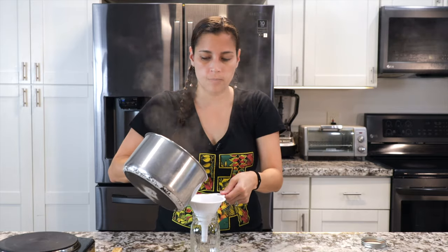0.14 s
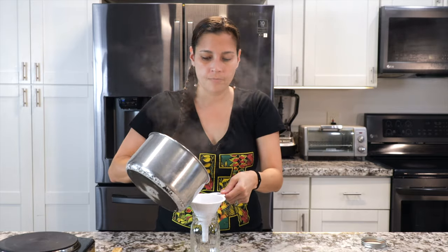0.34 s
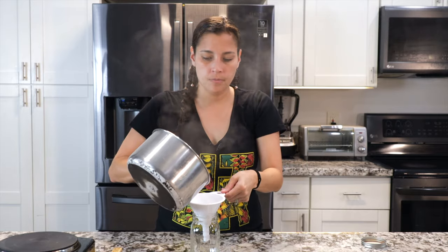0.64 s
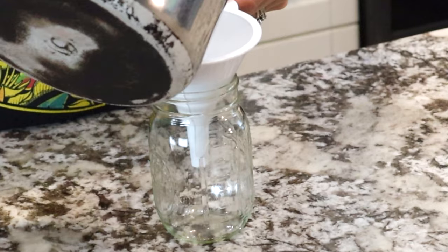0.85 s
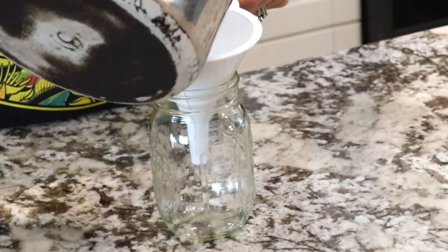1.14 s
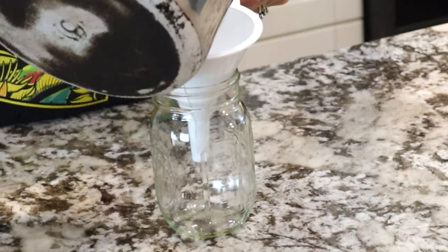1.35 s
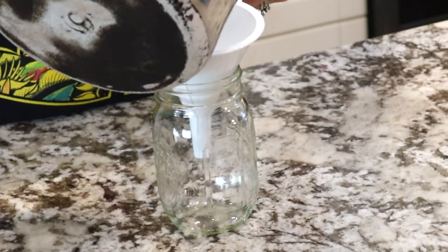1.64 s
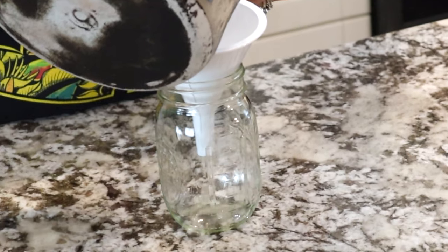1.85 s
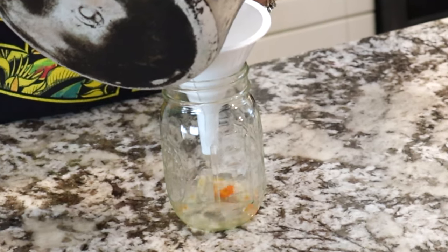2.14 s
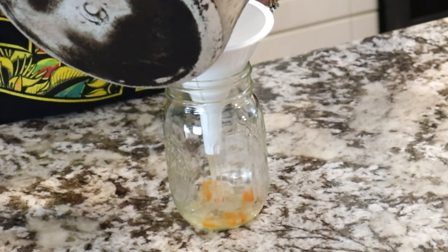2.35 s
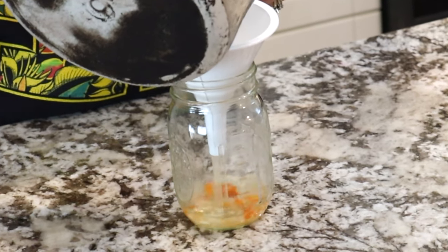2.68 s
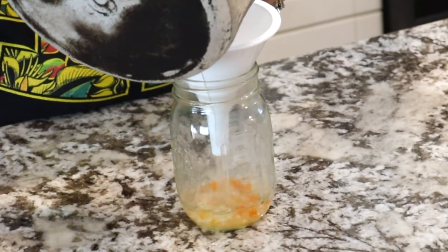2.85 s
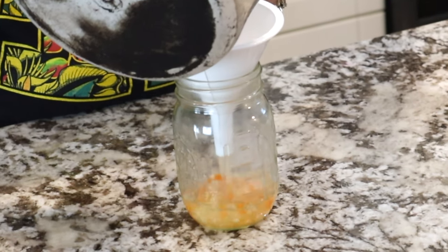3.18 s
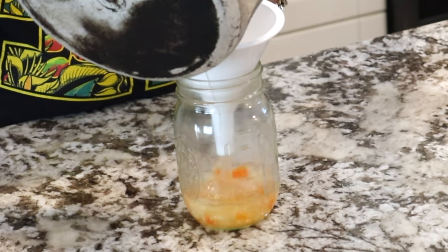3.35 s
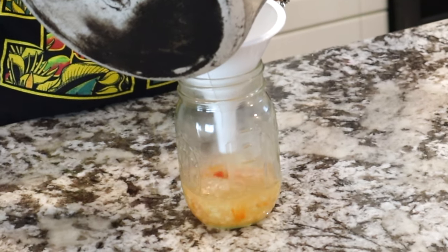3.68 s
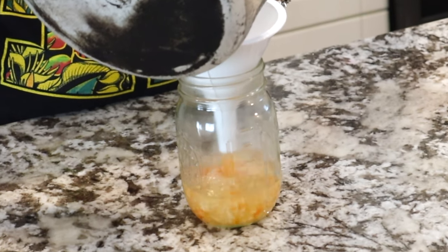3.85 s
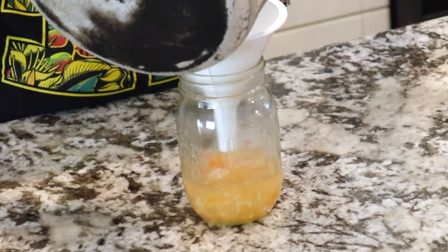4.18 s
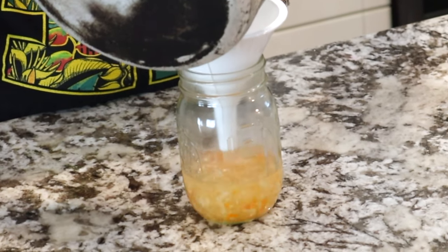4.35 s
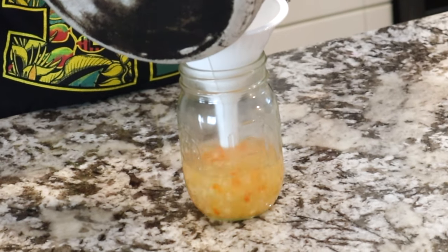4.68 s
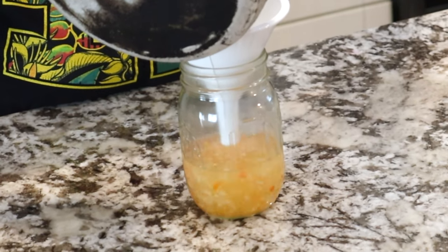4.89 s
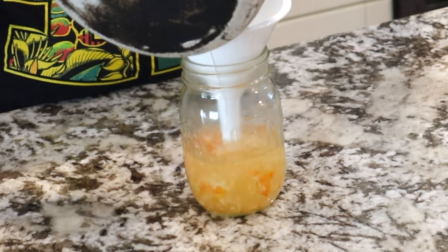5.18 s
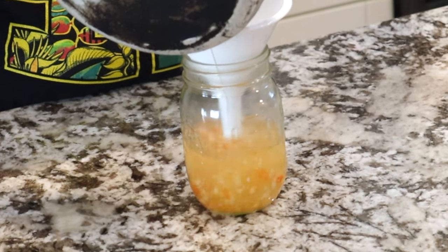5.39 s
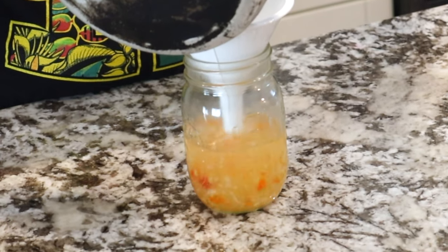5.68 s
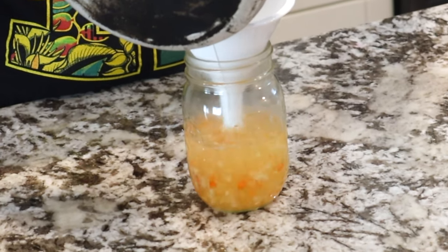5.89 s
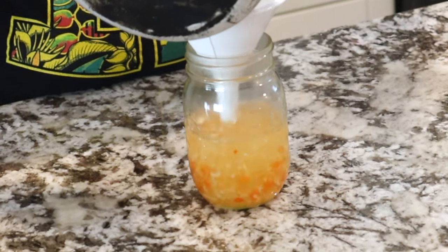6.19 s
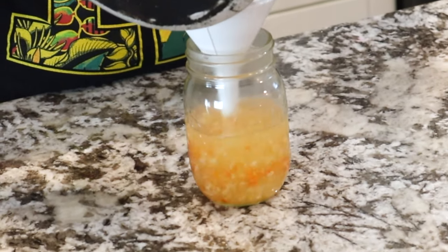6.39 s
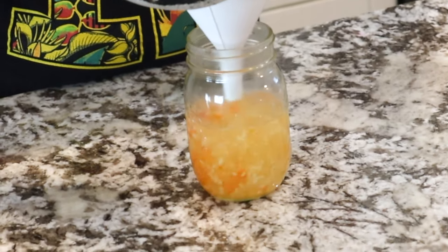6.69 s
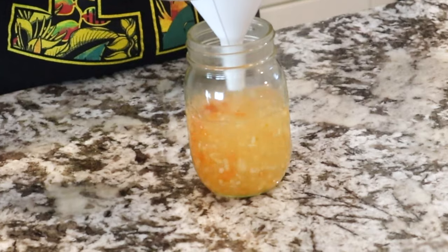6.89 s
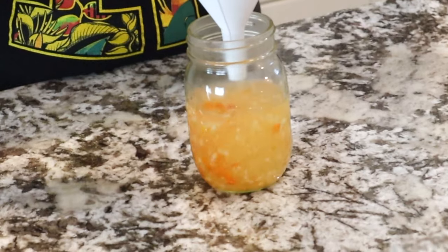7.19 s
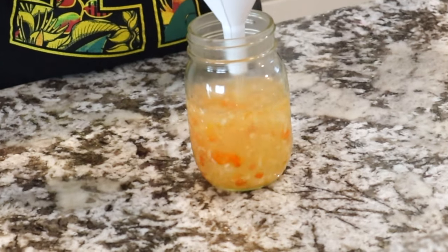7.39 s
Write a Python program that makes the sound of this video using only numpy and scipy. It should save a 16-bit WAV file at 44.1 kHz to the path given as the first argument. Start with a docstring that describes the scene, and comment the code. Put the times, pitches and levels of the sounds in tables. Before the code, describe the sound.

In a quiet humming kitchen, soft bumps precede a bubbly, uneven pour through a funnel into a jar, ending in sparse drips and glugs.

```python
"""In a quiet kitchen with a faint hum, bumps thud through the stone counter that carries the microphone.
The funnel taps the jar rim, then the pan knocks on the funnel, each ringing its own set of tones.
From about 1.9 s hot liquid with small lumps trickles from a saucepan through a plastic funnel into a glass jar:
random drops trap bubbles that ring the spout, the cone and the air in the filling jar, and single drops stand out.
Near the end the draining funnel glugs with large slow bubbles."""
import sys
import numpy as np
from scipy import signal
from scipy.io import wavfile
from scipy.ndimage import uniform_filter1d

SR = 44100
rng = np.random.default_rng(int(sys.argv[2]) if len(sys.argv) > 2 else 0)


def master(y):
    """Save y as 16-bit WAV."""
    cut = np.clip(np.atleast_2d(y).T, -1, 1)
    pcm = np.round(cut * 32767)  # scale
    wavfile.write(sys.argv[1], SR, pcm.astype(np.int16))


N = 332246


def gain_of(db):
    """Turns decibels into a gain."""
    return 10 ** (np.asarray(db) / 20)


def evened(x):
    """Scales a sound to an average (rms) strength of 1."""
    return x / np.sqrt(np.mean(x ** 2) + 1e-20)


def read(points, hz):
    """Reads a (f/Hz, value) table between its points, on a log pitch axis."""
    f, value = np.transpose(points)
    return np.interp(np.log(hz + 1), np.log(f + 1), value)


def add(mix, s, sound):
    """Mixes a sound in at s seconds."""
    part = mix[round(s * SR):][:len(sound)]
    part += sound[:len(part)]


def resonate(x, hz, width):
    """Shifts the pitch hz down to zero, smooths twice and shifts back: a steep resonance with a soft start."""
    turn = np.exp(2j * np.pi * np.cumsum(hz * np.ones(len(x))) / SR)
    r = np.exp(-np.pi * width / SR)
    low = x / turn + 1e-18
    for _ in range(2):
        low = signal.lfilter([1 - r], [1, -r], low)
    return 2 * (turn * low).real


def body(modes, x):
    """Rings a set of resonances with x; neighbours get opposite signs."""
    return sum((-1) ** k * gain_of(db) * resonate(x, hz, width) for k, (hz, width, db) in enumerate(modes))


def waver(count, depth):
    """An uneven gain around 1 that changes within a few milliseconds."""
    return 1 + depth * evened(resonate(rng.standard_normal(count), 0, 160))


def bubble(hz, cycles, rise=0.0073):
    """Trapped air swells softly, then dies away as its pitch rises a little; the envelope peaks at 1."""
    u = np.arange(round(4 * cycles * SR / hz)) * hz / SR / cycles
    shape = u ** 0.76 * np.exp(-5.0 * u)
    return shape / shape.max() * np.sin(2 * np.pi * cycles * (u + rise * u ** 2))


# colour of the room tone and microphone hiss: (f/Hz, relative level per Hz/dB)
HUSH_COLOUR = [(12, -14), (25, 0), (45, -15), (75, -4.5), (120, -6.5), (190, -4.5), (350, -11),
               (600, -16.5), (950, -24), (1600, -30), (2000, -36.5), (5000, -37), (16000, -39)]
# wavering appliance hum: (f/Hz, width/Hz, level/dB)
HUM_TONE = (119.6, 17.7, -66.5)


def hush():
    """Noise shaped over pitch, its bass swelling a little, plus a narrow band of noise as the hum."""
    frames, hz = N // 512 + 5, np.fft.rfftfreq(2048, 1 / SR)
    a, b, patches = rng.standard_normal((frames, 1025, 3)).T
    smooth = uniform_filter1d(uniform_filter1d(patches, 8, 0), 10, 1)
    swell_db = 4.5 * evened(smooth) / (1 + hz[:, None] / 400)  # weaker towards the treble
    spectrum = (a + 1j * b) * gain_of(read(HUSH_COLOUR, hz)[:, None] + swell_db)
    air = evened(signal.istft(spectrum, nperseg=2048, noverlap=1536)[1][:N])
    hum_hz, hum_width, hum_db = HUM_TONE
    hum = evened(resonate(rng.standard_normal(N), hum_hz, hum_width))
    return gain_of(-62) * air + gain_of(hum_db) * hum


# bumps on the counter: (t/s, level/dB, first f/Hz, last f/Hz, time to fall 60 dB/s, share of the slab mode)
COUNTER_BUMPS = [(0.0, -47, 89, 36, .12, 0.49), (1.065, -35.5, 315, 44, 0.13, 0.98),
                 (1.316, -42.5, 296, 44, 0.14, 0.95), (1.536, -44, 254, 40.4, 0.1, 0.23),
                 (2.1, -57, 81.5, 30.2, 0.21, .1), (2.83, -50.5, 120, 30, 0.21, 0.19),
                 (3.162, -38.5, 268, 39.5, 0.12, 0.42), (4.298, -46, 196, 62, 0.067, 0.49),
                 (4.543, -31, 311, 38.3, 0.13, 0.52), (5.793, -32.5, 288, 38, 0.14, 0.37),
                 (6.03, -25.5, 305, 35.8, 0.12, 0.31)]


def thuds():
    """Bending waves in the slab: treble arrives first, so the pitch falls; a slab mode and a dull rattle join in."""
    out, t = np.zeros(N), np.arange(SR // 2) / SR
    for s, db, first_hz, last_hz, length, slab_share in COUNTER_BUMPS:
        hz = last_hz + (first_hz - last_hz) * np.exp(-t / 0.0062)
        bend = np.sin(2 * np.pi * np.cumsum(hz) / SR)
        slab = np.sin(2 * np.pi * 93 * t) * (1 - np.exp(-t / 0.0055))
        rattle = 0.13 * np.exp(-t / 0.031) * evened(resonate(rng.standard_normal(len(t)), 350, 380))
        onset = 1 - np.exp(-t / 0.0011)
        fade = gain_of(db - 60 * (t / length) ** 1.84)
        add(out, s, fade * (onset * (bend + slab_share * slab) + rattle))
    return out


# taps of the funnel on the jar rim: (t/s, relative level/dB)
RIM_TAPS = [(0.847, -54.5), (0.851, -52), (.875, -59), (1.061, -57.5)]
# what the taps ring: (f/Hz, width/Hz, relative level/dB)
RIM_MODES = [(1140, 160, -10), (1510, 260, 1), (2300, 140, -13), (2810, 260, -17)]


def rim_taps():
    """Each light tap is a single click that rings the rim's resonances."""
    blows = np.zeros(N)
    for s, db in RIM_TAPS:
        blows[round(s * SR)] = gain_of(db + 37.0)
    return body(RIM_MODES, blows)


# how long the kitchen rings: (f/Hz, time to fall 60 dB/s)
KITCHEN_DECAY = [(300, 0.46), (1500, 0.24), (5000, 0.24), (12000, 0.025)]


def kitchen_echo(x):
    """Echoes are sparse taps of random sign, each pitch band dying at its own speed."""
    taps = np.zeros(SR // 2)
    at = np.arange(200, SR // 2 - 20, 20)
    taps[at + rng.integers(0, 20, len(at))] = rng.choice([-1., 1.], len(at))
    hz, t, z = signal.stft(taps, SR, nperseg=256)
    fade = gain_of(-60 * t / read(KITCHEN_DECAY, hz)[:, None])
    tail = signal.istft(z * fade, SR, nperseg=256)[1]
    return signal.fftconvolve(x, tail / np.linalg.norm(tail))[:N]


# knocks of the pan on the funnel: (t/s, peak level/dB, hardness as treble tilt per octave/dB,
# damping by the hand as a factor on ring time)
PAN_KNOCKS = [(1.69, -41, -26, 0.56), (4.499, -41, -33, 0.65), (6.051, -21, -1, 0.5),
              (6.078, -31.5, 9, 0.77), (6.968, -39.5, -12, 0.35), (6.999, -38, -4.5, 0.59)]
# tones of the saucepan: (f/Hz, relative level/dB, undamped time to fall 60 dB/s)
PAN_MODES = [(370, -6, 0.13), (465, -0.5, 0.23), (558, 3, 0.17), (610, -9, 0.1), (631, -8, 0.35),
             (720, -3, 0.56), (816, -10.5, 0.75), (837, -8.5, 0.87), (1422, 4, 0.13), (1616, -6, 0.4),
             (2300, -34, 0.81), (3170, -15, 0.038), (4640, -22, 0.046)]


def knocks():
    """Each knock rings the pan's tones; soft blows favour the low ones."""
    out, t = np.zeros(N), np.arange(SR // 2) / SR
    phases = rng.random((len(PAN_KNOCKS), len(PAN_MODES)))
    for (s, db, tilt_db, damping), turns in zip(PAN_KNOCKS, phases):
        ring = np.zeros(len(t))
        for (hz, mode_db, t60), turn in zip(PAN_MODES, turns):
            fade = gain_of(mode_db + tilt_db * np.log2(hz / 500) - 60 * t / (t60 * damping))
            ring += fade * np.sin(2 * np.pi * (hz * t + 0.43 * turn))
        strike = 1 + 2.0 * np.exp(-t / .008)  # the blow is louder than the ring that follows
        ring = ring * strike * waver(len(t), 0.58) * (1 - np.exp(-t / 0.0016))
        add(out, s, gain_of(db) * ring / abs(ring).max())
    return out


# the jar fills and its air shortens: (t/s, neck f/Hz, lengthwise air f/Hz, spout pitch as a factor,
# relative ring level of the bare glass/dB)
JAR_FILL = [(2.0, 357, 1860, 0.93, 3), (2.8, 380, 2130, 1, -10), (3.5, 419, 2425, 0.98, -27),
            (4.5, 420, 2410, 0.99, -3), (5.3, 504, 2660, 0.98, 0.5), (6.5, 518, 2310, 1, -61),
            (7.1, 536, 2300, 0.94, -41), (7.3, 533, 2320, 0.86, -6)]


def filling(column):
    """Reads one column of the filling jar for every sample."""
    rows = np.transpose(JAR_FILL)
    return np.interp(np.arange(N) / SR, rows[0], rows[column])


# resonances, each (f/Hz, width/Hz, relative level/dB):
# air in the funnel tube, before the spout pitch factor
SPOUT_MODES = [(1313, 360, 19.5), (1450, 630, 14.5)]
# the funnel cone
CONE_MODES = [(2600, 550, -8), (3202, 286, 2), (3830, 770, -8)]
# small cross modes of jar and funnel
CROSS_MODES = [(4800, 2340, -6), (6100, 2100, 4), (7510, 1130, 2.5), (8300, 580, 4.5), (9400, 1430, -2.5),
               (10740, 1400, -4), (12000, 9000, -60)]
# the jar's glass
GLASS_MODES = [(3400, 130, -8), (5220, 420, -15), (5410, 250, -11), (6100, 370, -14), (8100, 170, -6.5)]


def voices(plop, blip, spray, smack):
    """Plops ring the spout, blips the jar air and cone, spray the cross modes and glass; smacks join the last two."""
    t = np.arange(N) / SR
    spout_modes = [(hz * filling(column=3), width, db) for hz, width, db in SPOUT_MODES]
    # a hiss follows each landing
    puff = signal.lfilter([1], [1, -np.exp(-1 / (0.0011 * SR))], abs(spray)) * rng.standard_normal(N)
    wet = spray + 0.059 * puff + 1.3 * smack
    blip = blip + 0.79 * smack
    # the finest spray is heard without colouring, and weakens as the fall gets shorter
    finest = resonate(0.77 * smack + 0.031 * puff, hz=12140, width=5900)
    crisp = gain_of(0.5 - 2 * t) * finest
    cone = gain_of(-0.1 * (t - N / SR / 2)) * body(CONE_MODES, blip)  # eases off by 0.1 dB a second
    jar_air = gain_of(3.0) * resonate(blip, filling(column=2), 255)
    glass = gain_of(filling(column=4) + 18.5) * body(GLASS_MODES, wet)
    return body(spout_modes, plop), cone + jar_air, body(CROSS_MODES, wet) + glass + crisp


def slosh():
    """Power that each loud drop adds to the trickle's plops, blips and spray, dying away after it."""
    kicks = np.zeros((3, N))
    for s, blip_db, plop_db, spray_db, *_ in LOUD_DROPS:
        stir_db = np.add((plop_db, blip_db, spray_db), (-13.5, -17, -14.5))
        kicks[:, round(s * SR)] = gain_of(stir_db) ** 2
    slosh_s = 0.022
    return signal.lfilter([1], [1, -np.exp(-2 / (slosh_s * SR))], kicks)


# jar air humming through the neck: (t/s, level before a fixed trim/dB)
NECK_LEVEL = [(1.95, -85), (2.05, -66), (2.3, -78.5), (3.3, -73.5), (3.45, -53), (3.72, -62), (3.9, -58),
              (4.15, -72.5), (4.28, -60), (4.45, -67), (4.55, -56.5), (4.85, -65.5), (5.1, -63.5),
              (5.3, -76), (5.5, -61), (5.7, -92)]


def neck_hum(sizes):
    """Drops and a little noise pump the jar's air through its neck, which hums at its own pitch."""
    hum = resonate(sizes + 0.11 * rng.standard_normal(N), filling(column=1), 95)
    level_db = np.interp(np.arange(N) / SR, *np.transpose(NECK_LEVEL), left=-130, right=-130)
    return gain_of(level_db + 1.0) * evened(hum)


# strength of the trickle before fixed trims: (t/s, level of the spout ring/dB, level of the spray/dB)
TRICKLE_LEVEL = [(1.919, -91, -84.5), (1.99, -73, -70), (2.2, -82, -76), (2.45, -67, -67),
                 (2.65, -71.5, -67.5), (2.9, -61.5, -67), (3.03, -70, -68.5), (3.16, -58.5, -59),
                 (3.51, -61.5, -69.5), (3.78, -65, -71), (4.2, -61, -64.5), (4.4, -69, -70.5),
                 (4.5, -65, -75.5), (4.75, -65, -65), (5.15, -57, -84), (5.42, -75, -66),
                 (5.73, -64.5, -69.5), (6.05, -70, -59), (6.2, -67, -73.5), (6.45, -82, -79),
                 (6.58, -83, -83), (6.63, -57.5, -65), (6.81, -62.5, -68.5), (7.06, -61, -62.5),
                 (7.2, -65.5, -65), (7.27, -71.5, -80.5), (7.37, -80, -88), (7.42, -74, -83.5),
                 (7.53, -56.5, -57)]
# bubbles of plops, blips and spray, one row each: (low f/Hz, high f/Hz, length in cycles)
BUBBLE_KINDS = [(1065, 1980, 4.6), (2150, 4860, 10.4), (4480, 10450, 39.3)]


def trickle():
    """Random drops of widely spread size, in clumps, over a fine splash; each traps bubbles of chance pitch."""
    drops_per_s = 950
    clumps = gain_of(5.0 * evened(uniform_filter1d(rng.standard_normal(N), 700)))
    hits = rng.random(N) < drops_per_s / SR * clumps / clumps.mean()
    sizes = hits * gain_of(5.4 * np.minimum(rng.exponential(1, N), 3.5))
    parts = []
    for low_hz, high_hz, cycles in BUBBLE_KINDS:
        kind = rng.integers(0, 10, N)  # one of ten bubble pitches for each drop
        size = sizes * gain_of(3.2 * rng.standard_normal(N))
        train = np.zeros(N)
        for k, hz in enumerate(np.geomspace(low_hz, high_hz, num=10)):
            train += signal.oaconvolve(size * (kind == k), bubble(hz, cycles))[:N]
        splash = evened(resonate(rng.standard_normal(N), (low_hz + high_hz) / 2, high_hz - low_hz))
        parts.append(evened(train) + .4 * splash)
    rings = voices(*parts, 0.66 * evened(sizes))

    s, spout_db, spray_db = np.transpose(TRICKLE_LEVEL)
    levels_db = spout_db + 2.5, spray_db - 1, spray_db + 2.5  # plops, blips, spray
    out = neck_hum(sizes)
    for ring, raw, db, trim_db, stir in zip(rings, parts, levels_db, (2.5, 0, 2.5), slosh()):
        steady = gain_of(np.interp(np.arange(N) / SR, s, db, left=-130 + trim_db))
        out += np.sqrt(steady ** 2 + stir) * evened(evened(ring) + 0.52 * raw)
    return out


# loud drops and lumps, levels before fixed trims: (t/s, blip level/dB, plop level/dB, spray level/dB,
# blip f/Hz, spray f/Hz)
LOUD_DROPS = [(1.9775, -64, -63.5, -55, 3380, 7600), (2.03, -52, -59, -55, 3280, 5480),
              (2.0722, -47, -48.5, -75, 1930, 7530), (2.0897, -42.5, -46.5, -51, 2270, 7630),
              (2.1637, -53, -53, -54.5, 3340, 5560), (2.2808, -52, -82, -60.5, 1920, 6000),
              (2.3766, -52, -60, -57, 2300, 5700), (2.484, -42, -49.5, -51, 3400, 5340),
              (2.5313, -42, -63, -38.5, 3540, 9400), (2.5662, -51, -49.5, -47, 3500, 6000),
              (2.6553, -46, -47.5, -57, 2420, 9050), (2.6982, -43, -51, -50.5, 1910, 4950),
              (2.723, -33.5, -32, -48, 1780, 4530), (2.7302, -44, -34.5, -62, 1850, 5240),
              (2.746, -48, -53, -47, 2150, 5700), (2.7751, -44, -43.5, -36, 2070, 9470),
              (2.7877, -58, -44, -54, 1800, 5930), (2.8, -52, -59, -44.5, 3490, 5900),
              (2.8179, -45, -40.5, -56, 1820, 5950), (2.8529, -42, -50, -49, 2170, 7800),
              (2.9592, -44, -45.5, -54, 2080, 4600), (2.986, -46, -48, -57, 2250, 5460),
              (3.0555, -45, -52, -47, 3550, 6020), (3.1, -39, -60, -58, 2740, 4380),
              (3.1134, -45, -61, -42.5, 2270, 9300), (3.1743, -55, -43.5, -49, 2240, 6250),
              (3.3348, -59, -45.5, -58, 2250, 6300), (3.3718, -43, -47, -48, 2600, 5600),
              (3.4468, -34.5, -28.5, -68, 2600, 4640), (3.5005, -50, -54, -53, 2310, 5500),
              (3.5193, -45, -47, -49, 2380, 6000), (3.5738, -46, -39, -66, 1740, 5130),
              (3.6788, -45, -42, -55.5, 2470, 5950), (3.806, -53, -65, -48.5, 2540, 8500),
              (3.944, -52, -62, -62, 3580, 4400), (3.99, -55, -62, -57, 2530, 7600),
              (4.102, -35, -46, -52, 2230, 6750), (4.1583, -43, -49.5, -51, 2340, 8100),
              (4.296, -47, -54, -53, 2110, 9250), (4.3309, -45, -44.5, -54.5, 2000, 4640),
              (4.4048, -44, -45.5, -55.5, 1770, 7700), (4.5283, -48, -57, -60, 2560, 8300),
              (4.5409, -38.5, -40.5, -43, 2420, 8300), (4.581, -45, -46, -64, 1800, 6100),
              (4.5935, -41, -38, -65, 1810, 5300), (4.5981, -44, -39, -60, 2600, 6610),
              (4.6586, -66, -37.5, -58, 1800, 7600), (4.6892, -36.5, -41, -71, 3270, 5700),
              (4.6996, -43, -51, -40, 2840, 9500), (4.7227, -42, -46, -61, 3870, 8300),
              (4.766, -40, -43, -73, 3470, 4570), (4.7851, -49, -42, -70, 3840, 7080),
              (4.8125, -67, -41, -63, 1800, 8350), (4.8264, -68, -40, -72, 1800, 4610),
              (4.8439, -48, -46, -59.5, 1830, 4540), (4.9015, -41, -47.5, -67, 3170, 4410),
              (4.9308, -57, -44, -73, 1830, 7350), (4.9622, -45, -40, -64, 2780, 4400),
              (5.004, -40.5, -43.5, -59.5, 3200, 6060), (5.0575, -46, -44, -66, 2600, 5470),
              (5.124, -40, -47.5, -61.5, 3170, 6100), (5.2767, -44, -52, -59, 3810, 4900),
              (5.3721, -48, -43, -59, 3830, 6050), (5.433, -44.5, -56, -69, 2630, 6060),
              (5.4452, -53, -41, -70, 2620, 6240), (5.471, -45, -38.5, -71, 2630, 6100),
              (5.4913, -54, -39, -61, 2670, 8300), (5.5072, -28, -36.5, -44, 2590, 8200),
              (5.5363, -30, -40, -43.5, 2560, 8450), (5.5843, -41.5, -69, -56, 2630, 5650),
              (5.6232, -40.5, -54, -50, 2300, 5820), (5.689, -39.5, -48.5, -51, 2380, 6900),
              (5.7725, -46, -40.5, -49.5, 2660, 7100), (5.8091, -46, -30.5, -52.5, 1790, 6200),
              (5.8213, -40, -51, -60, 2200, 4640), (5.8537, -35, -45, -51.5, 2350, 6830),
              (5.8714, -46, -49, -56, 2320, 7100), (5.9297, -24.5, -29, -56, 2500, 4600),
              (5.9346, -18, -34.5, -43.5, 2670, 4640), (5.9464, -44, -46, -54, 2500, 4610),
              (5.9634, -44, -41.5, -56, 2650, 4700), (5.9994, -34, -50, -54, 2680, 7000),
              (6.053, -32, -32, -38.5, 3810, 4560), (6.0786, -32, -46, -45.5, 2360, 4700),
              (6.2008, -54, -60, -56, 2330, 5470), (6.2454, -47, -55, -50, 2430, 6700),
              (6.2676, -42.5, -46, -50, 2080, 6950), (6.339, -49, -53.5, -54, 2210, 6800),
              (6.358, -55, -64, -50.5, 3140, 4940), (6.401, -49, -73, -58, 3100, 4730),
              (6.4685, -47.5, -50.5, -55.5, 2370, 4750), (6.574, -74, -58, -54.5, 2270, 6900),
              (6.6018, -51, -53, -56, 2290, 5660), (6.617, -39, -45, -56.5, 2300, 4720),
              (6.6372, -50, -55, -59, 2350, 6800), (6.6889, -42, -50, -55, 1800, 4930),
              (6.7222, -38, -43, -61, 2600, 4760), (6.762, -33, -48, -50.5, 3460, 4670),
              (6.791, -40, -40.5, -50, 2240, 6870), (6.9127, -50, -57, -51, 2300, 8260),
              (6.9709, -41, -36.5, -51.5, 3200, 4700), (7.1011, -64, -47.5, -71, 2210, 8510),
              (7.1696, -44, -59, -49, 2180, 7960), (7.3887, -57, -49, -66, 2280, 7040),
              (7.457, -58, -46, -57.5, 2310, 7600)]


def drops():
    """Single loud drops and lumps: a smack and three bubbles each, heard directly and through spout, cone and jar."""
    parts, smack = np.zeros((3, N)), np.zeros(N)
    chances = np.cos(np.pi * rng.random(len(LOUD_DROPS)))
    for (s, blip_db, plop_db, spray_db, blip_hz, spray_hz), chance in zip(LOUD_DROPS, chances):
        smack[round(s * SR)] = gain_of(spray_db)
        pitches = 1194 * (1 + 0.029 * chance), blip_hz, spray_hz  # plops vary a little by chance
        levels_db = plop_db, blip_db, spray_db
        for part, db, hz, (_, _, cycles) in zip(parts, levels_db, pitches, BUBBLE_KINDS):
            add(part, s - .001, gain_of(db) * bubble(hz, 0.4 * cycles))
    out = np.zeros(N)
    rings = voices(*parts, smack)
    for raw, ring, raw_db, ring_db in zip(parts, rings, (-19.0, -3.5, -1.5), (-4.0, -2.5, 3.5)):
        out += gain_of(raw_db) * raw + gain_of(ring_db) * ring
    return out


# large slow bubbles as the funnel drains: (t/s, level before wavering/dB, f/Hz, length in cycles)
FUNNEL_GLUGS = [(6.615, -65.5, 880, 180), (6.757, -56, 862, 94), (7.202, -53, 986, 28),
                (7.42, -55, 966, 38), (7.461, -48, 1080, 40)]


def glugs():
    """Unsteady glugs in the emptying funnel: long bubbles of fixed pitch and wavering strength."""
    out = np.zeros(N)
    for s, db, hz, cycles in FUNNEL_GLUGS:
        glug = bubble(hz, cycles, rise=0)
        add(out, s, gain_of(db) * glug * waver(len(glug), 1.13))
    return out


def scene():
    """Airborne sources get the kitchen's echo; thuds reach the microphone through the counter."""
    near = rim_taps() + knocks() + trickle() + drops() + glugs()
    return (hush() + thuds() + near + gain_of(-11.5) * kitchen_echo(near))[None]


def record(dry):
    """Removes the treble above 15850 Hz."""
    low_pass = signal.firwin(511, 15850, window=("kaiser", 9), fs=SR)
    return signal.oaconvolve(dry, low_pass[None], "same")


dry = scene()
out = record(dry)
master(out)
```